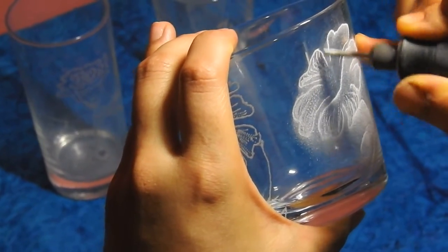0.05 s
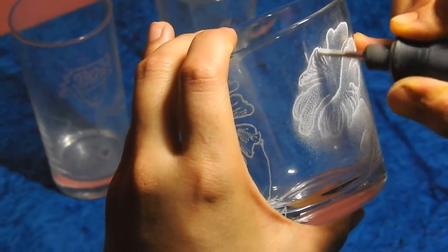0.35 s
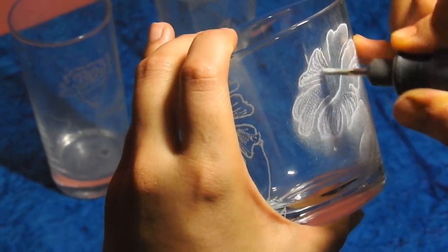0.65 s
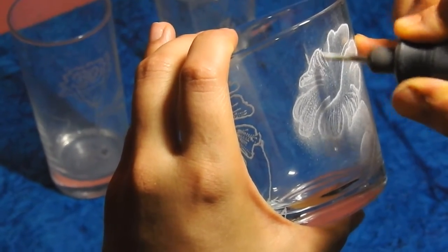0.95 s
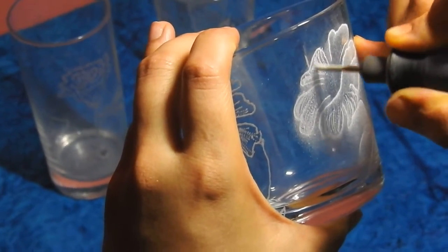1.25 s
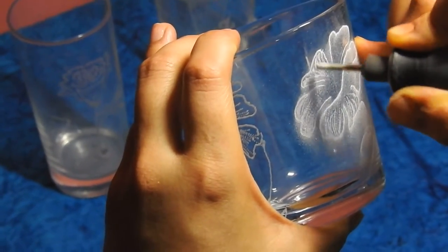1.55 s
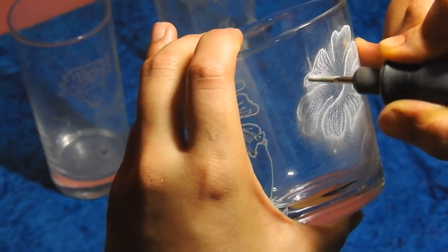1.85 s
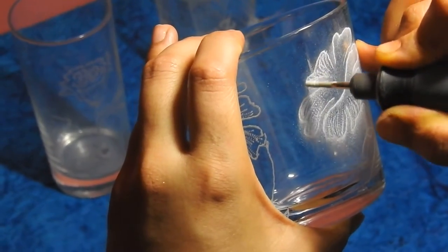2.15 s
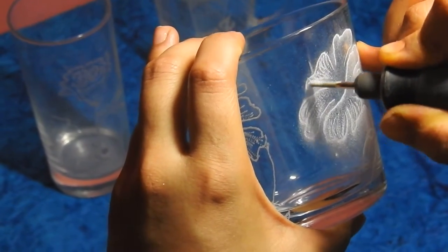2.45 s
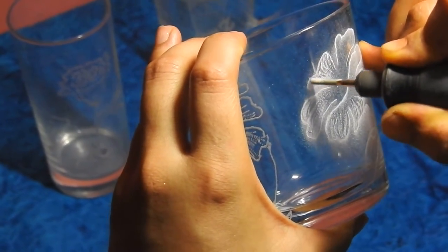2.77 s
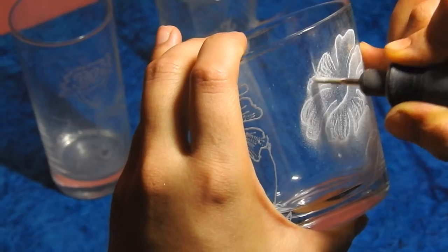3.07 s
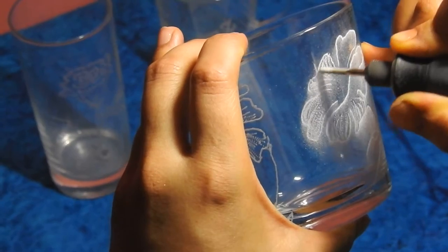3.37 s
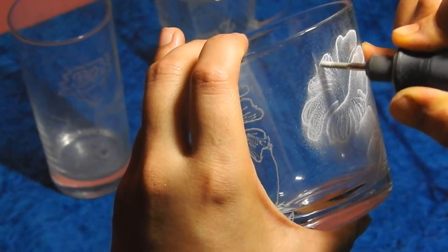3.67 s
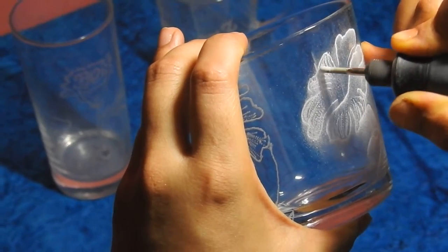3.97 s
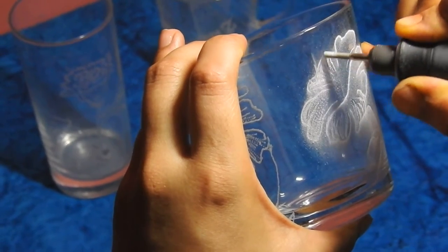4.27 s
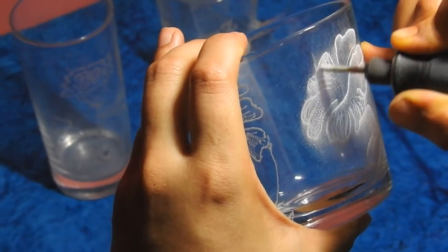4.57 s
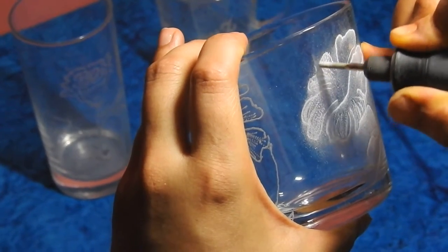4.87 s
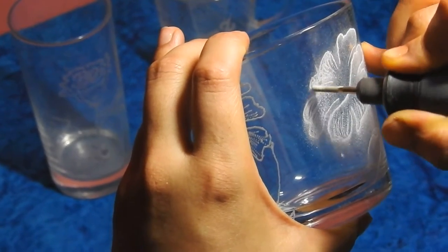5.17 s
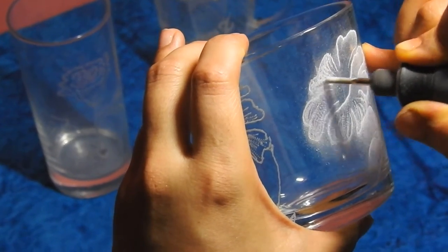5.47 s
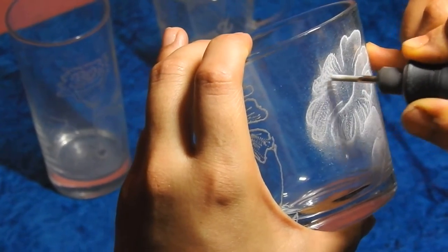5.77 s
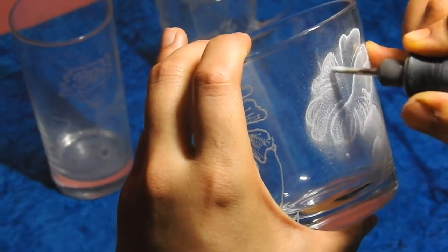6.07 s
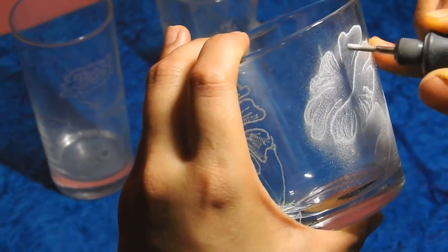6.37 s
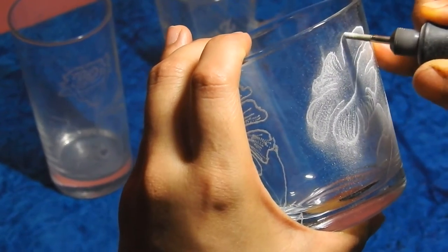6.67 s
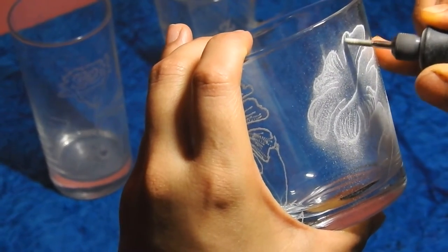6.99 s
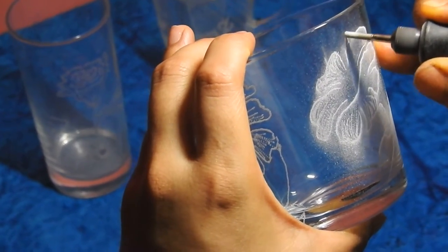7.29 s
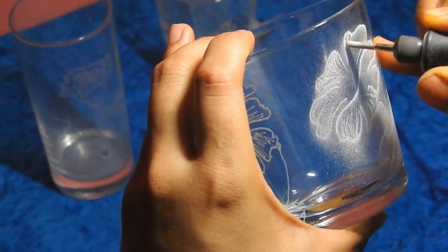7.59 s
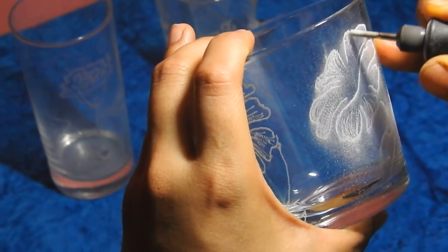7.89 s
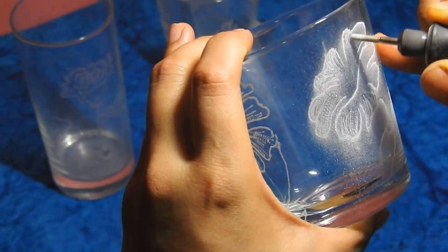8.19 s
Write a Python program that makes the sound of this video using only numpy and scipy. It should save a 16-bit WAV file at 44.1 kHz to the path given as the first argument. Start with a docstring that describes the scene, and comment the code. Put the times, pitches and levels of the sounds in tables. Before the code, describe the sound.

Close up, an engraving bit ticks and grinds against ringing glass, stroke after stroke, over the constant whine of a small motor.

```python
"""A small rotary tool engraves a drinking glass, close to a stereo microphone.
Each stroke of the bit lands with a crack, then scrapes the wall and sets it ringing. Underneath, at a
steady speed, the motor whines on its shaft orders, buzzes with the mains and crackles at its brushes.
The recorder's gain control pushes the motor back whenever the bit bites."""
import sys
import numpy as np
from scipy import signal
from scipy.fft import rfft, irfft, next_fast_len
from scipy.io import wavfile
from scipy.ndimage import uniform_filter1d, minimum_filter1d

SR = 44100
rng = np.random.default_rng(int(sys.argv[2]) if len(sys.argv) > 2 else 0)


def inscribe(sig):
    """Save sig as 16-bit PCM at rate SR to the path in sys.argv[1].

    A 1-D sig is mono; a 2-D sig holds one channel per row.
    Samples are clipped to [-1, 1] before scaling.
    """
    pcm = np.round(np.clip(np.atleast_2d(sig).T, -1, 1) * 32767)
    wavfile.write(sys.argv[1], SR, pcm.astype(np.int16))


N = 372201
TIME = np.arange(N) / SR

# Modes of the glass, damped by the hand. Each row: pitch in Hz, width in Hz, relative level in dB,
# family (rounded to an index).
GLASS_MODES = [(1673, 21, -8, 0), (2137, 65, -3.5, 2), (2216, 48, -3, 0.5), (3877, 19, -8.5, 0.5),
               (4662, 58, 4.5, 1.5), (7210, 920, -1, 3), (7797, 170, 5.5, 2), (11130, 110, -17, 2),
               (11910, 85, -13, 2)]
# Strokes of the bit: quick hatching, longer shading, hatching again, then close strokes at the rim.
# Each row: start in seconds, length in seconds, relative pressure in dB, relative landing knock in dB.
BIT_STROKES = [(0.104, .12, 4, -14), (0.339, 0.1, 4, -14.5), (0.578, 0.074, 4.5, -10),
               (0.793, .11, 1.5, -12), (1.027, 0.056, 6, -16), (1.23, 0.058, 4, -21),
               (1.413, 0.09, 1.5, -21), (1.62, 0.044, 5, -12.5), (1.96, 0.19, 0.5, -12.5),
               (2.172, 0.17, -1, -21), (2.363, .19, -0.5, -30), (2.622, 0.11, -1.5, -28),
               (2.862, .15, -0.5, -20), (3.026, 0.24, 2.5, -28), (3.308, 0.2, 2.5, -24),
               (3.591, 0.16, -0.5, -27), (3.756, 0.18, 5, -24), (3.962, 0.32, 2, -34),
               (4.296, 0.287, 2.5, -22), (4.684, 0.2, 3.5, -15), (4.872, 0.11, 0, -15),
               (5.018, 0.24, 1.5, -35), (5.378, 0.13, 2.5, -18), (5.628, 0.078, 3.5, -18),
               (5.838, 0.1, 4.5, -13), (6.05, 0.076, 0, -12.5), (6.675, .3, 0.5, -23), (6.992, .15, 3, -31),
               (7.19, 0.21, 4, -29), (7.411, 0.326, 6, -24), (7.757, 0.3, 5, -30), (8.054, .4, 5.5, -28)]


def from_db(db):
    """Decibels to gain."""
    return 10 ** (np.asarray(db) / 20)


def unit(x):
    """Scales x to an rms of one."""
    return x / np.sqrt(np.mean(x ** 2) + 1e-20)


def colour(x, points):
    """Filters x with a spectrum given as (Hz, dB) points."""
    hz, db = np.transpose(points)
    f = np.fft.rfftfreq(x.shape[-1], 1 / SR)
    return irfft(rfft(x) * from_db(np.interp(np.log(f + 1), np.log(hz), db)), x.shape[-1])


def noise(points, envelope=np.ones(N)):
    """Coloured noise of unit rms under an envelope; left and right differ most in the treble."""
    # Stereo width at the microphone. Each row: frequency in Hz, side minus mid in dB.
    stereo_width = [(60, -16), (200, -31), (700, -19.5), (1300, -14.5), (2400, -14), (4400, -12.5),
                    (8000, -3.5), (15000, -4.5)]
    size = len(envelope)
    white = rng.standard_normal((2, size)) * envelope
    mid, side = np.pad(white, ((0, 0), (0, next_fast_len(size, True) - size)))
    side = colour(side, stereo_width)
    return unit(colour(np.array([mid + side, mid - side]), points)[:, :size])


def drift(rate):
    """A random wander of unit rms through rate points a second."""
    knots = rng.standard_normal(4096)
    return unit(np.interp(TIME * rate, np.arange(len(knots)), knots))


def pan(db):
    """Gains of the two channels for a left minus right level."""
    return from_db([[db / 2], [-db / 2]])


def ring(x, hz, width):
    """One resonance, its width in Hz."""
    return signal.lfilter(*signal.iirpeak(hz, hz / width, SR), x)


def add(mix, s, sound):
    """Mixes a sound in at s seconds."""
    part = mix[:, round(s * SR):][:, :sound.shape[-1]]
    part += sound[:, :part.shape[-1]]


def strikes(turns, spread_db, jitter_s):
    """One click of random size in each cycle of turns."""
    at = np.flatnonzero(np.diff(np.floor(turns)))
    size, late = rng.standard_normal((len(at), 2)).T
    at = np.clip(at + np.round(late * jitter_s * SR).astype(int), 0, N - 1)
    clicks = np.zeros(N)
    clicks[at] = from_db(spread_db * np.minimum(size, 2))
    return clicks


def bursts(clicks, decay_s, share):
    """Envelope of a noise that has a share of its power in short bursts after the clicks."""
    power = signal.lfilter([1], [1, -np.exp(-1 / (decay_s * SR))], clicks ** 2)
    return np.sqrt(1 - share + share * power / power.mean())


def tone(turns, waver_db, blur):
    """A partial that wavers in strength and, by about blur radians, in phase."""
    return unit(from_db(waver_db * drift(9.7)) * np.cos(2 * np.pi * turns + blur * drift(45)))


def grip():
    """The hand shifts its grip with soft, dull rubs."""
    # Each row: start in seconds, length in seconds, centre in Hz, relative level in dB.
    rubs = [(3.48, 0.22, 273, -36.5), (3.63, 0.16, 237, -32), (4.139, 0.13, 119, -33), (5.74, .14, 60, -45)]
    out = np.zeros((2, N))
    for start, length, hz, db in rubs:
        swell = np.hanning(round(length * SR))
        band = [(hz / 4, -24), (hz / 1.2, 0), (hz * 1.4, 0), (hz * 4, -30), (hz * 20, -80)]
        add(out, start, from_db(db) * noise(band, swell) * np.sqrt(swell))
    return out


def hum():
    """A low hum sits in the centre, behind the tool."""
    # Each row: pitch in Hz, level in dB.
    partials = [(100, -51.5), (180, -45.5), (200, -41), (300, -46)]
    return sum(from_db(db) * tone(hz * TIME, waver_db=2.8, blur=0.65) for hz, db in partials)


def fan():
    """Cooling air rushes through the tool and resonates in its housing."""
    # Each row: frequency in Hz, relative density in dB.
    air_spectrum = [(20, -48), (34, -43), (48, -13.5), (80, -15.5), (108, -8.5), (145, -14), (200, -7),
                    (320, -8.5), (850, -9), (1050, -9.5), (1500, -7), (2700, -6.5), (4000, -10.5),
                    (6000, -34)]
    # Each row: pitch in Hz, width in Hz, level in dB.
    housing_modes = [(1276, 33, -33.5), (1421.6, 15, -33.5), (2480, 200, -38)]
    air = from_db(-24) * noise(air_spectrum, from_db(1.02 * drift(40)))
    housing = sum(from_db(db) * unit(ring(noise(air_spectrum), hz, width))
                  for hz, width, db in housing_modes)
    return pan(-1.46) * air + pan(-1.6) * housing


def brushes(turns):
    """The brushes hiss and spark twice a turn."""
    # Each row: frequency in Hz, relative density in dB.
    spark_spectrum = [(1500, -20.5), (3000, -15), (4200, -2), (5200, 2), (6600, 5.5), (7500, -0.5),
                      (8400, -8), (10000, -18), (12000, -24.5), (15500, -101)]
    sparks = strikes(2 * turns, spread_db=8.0, jitter_s=0.00008)
    crackle = bursts(sparks, decay_s=0.00044, share=0.24)
    return from_db(-15.5) * pan(-0.52) * noise(spark_spectrum, crackle)


def armature_buzz(turns, order=16, mains_hz=50):
    """Rectified mains current ripples the armature's note into a cluster of sidebands."""
    # Each row: ripple steps away from the note, level in dB.
    sidebands = [(-2, -42), (-1, -91), (0, -39.5), (1, -29), (2, -27.5), (3, -40.5)]
    ripple = 2 * mains_hz * TIME
    return pan(0.54) * sum(from_db(db) * tone(order * turns + step * ripple, waver_db=2.5, blur=0.2)
                           for step, db in sidebands)


def motor_whine(turns):
    """The motor sings on its shaft orders; three shrill ones beam past the microphone as the hand turns."""
    # Each row: multiple of the shaft rate (rounded when played), level in dB, left minus right in dB.
    orders = [(3, -48.5, 1.5), (4, -44.5, 1), (6, -59, -13), (14, -47, 0), (17, -45.5, 31.5), (20, -42, 0),
              (21, -54, 0), (22, -41, -2), (24, -37.5, 7), (26, -46, 0), (27, -38, 0), (28, -46, 1),
              (30, -57, 0), (48, -35.5, -11), (64.66, -41, 9.5)]
    # Multiples of the shaft rate, the last just off a whole order like a bearing's.
    shrill_orders = [32, 36, 40.92]
    # Each row: time in seconds, then the level of each shrill partial in dB.
    beaming = [(0.0, -32, -25.5, -26), (0.55, -25, -21.5, -25), (1.2, -31, -21.5, -27.5),
               (4.2, -27, -21.5, -23.5), (4.8, -32, -26, -22), (5.1, -26, -19.5, -24),
               (6.5, -30, -21.5, -21.5), (7.3, -26, -27, -22.5), (8.44, -30, -21.5, -24.5)]
    whine = sum(from_db(db) * pan(balance) * tone(round(order) * turns, waver_db=3.0, blur=0.43)
                for order, db, balance in orders)
    times, *beams = np.transpose(beaming)
    shrill = sum(from_db(np.interp(TIME, times, db)) * tone(order * turns, waver_db=1.2, blur=0.31)
                 for order, db in zip(shrill_orders, beams))
    return whine + pan(-8.0) * shrill


def taps():
    """Each landing of the bit is a short crack that sets the glass ringing."""
    # Each row: frequency in Hz, relative density in dB.
    crack_spectrum = [(300, -31), (900, -14), (1400, 12.5), (2400, 4.5), (4000, 11.5), (8000, -26),
                      (11000, -36), (15000, -55)]
    cracks, t = np.zeros((2, N)), np.arange(2048) / SR
    envelope = (1 - np.exp(-t / 0.00026)) * np.exp(-t / 0.011)
    for start, _, _, db in BIT_STROKES:
        add(cracks, start, from_db(db) * noise(crack_spectrum, envelope))
    ringing = sum(from_db(db) * ring(cracks, hz, width) for hz, width, db, _ in GLASS_MODES)
    return from_db(-9.0) * cracks + from_db(-4.0) * ringing


def pressure(bite_s=0.023, lift_s=0.039, waver_db=2.5, graze_db=-23):
    """Each stroke bites, holds unsteadily and lifts; in between, the bit grazes faintly."""
    held = np.zeros(N)
    for start, length, db, _ in BIT_STROKES:
        bite = np.clip((TIME - start) / bite_s, 0, 1)
        lift = np.clip((start + length + lift_s - TIME) / lift_s, 0, 1) ** 2
        held += from_db(db) * bite * lift
    return from_db(graze_db) + held * from_db(waver_db * np.tanh(drift(22)))


def skid(decay_s=0.029, boost_db=8.5):
    """Envelope of the bit's brief skid after each landing, in proportion to its knock."""
    return sum(from_db(db + boost_db) * (TIME >= start) * np.exp(-abs(TIME - start) / decay_s)
               for start, _, _, db in BIT_STROKES)


def glass(drive, press, move_s=0.05):
    """The wall rings in its modes, weighted by how hard and where the bit touches it."""
    # Places of contact. Each row: start in seconds, then the weight in dB of mode families 0 to 3:
    # lower wall, upper wall (holds no mode), rim, broad screech.
    places = [(0, -13.5, -14, -10, -11), (0.55, -12, -19, -14, -8), (1.15, -15, -18, -19, -9),
              (1.95, -17, -10, -22, -1), (2.85, -13.5, -12.5, -20, -6), (5.35, -11.5, -19, -21, -6),
              (6.67, -15, -6.5, -11, -22)]
    starts, *families = np.transpose(places)
    place = np.searchsorted(starts[1:], TIME)
    glide = round(move_s * SR) + 1
    weights = [press * uniform_filter1d(from_db(db)[place], size=glide) for db in families]
    weights[0] += skid()  # skidding rings the lower wall
    return sum(from_db(db) * weights[round(family)] * unit(ring(ring(drive, hz, width), hz, 6 * width))
               for hz, width, db, family in GLASS_MODES)


def engraving(turns):
    """The slightly eccentric bit strikes once a turn, chips twice a turn and drags its grit in between."""
    # Each row: frequency in Hz, relative density in dB.
    scrape_spectrum = [(500, -38), (1500, -9), (3000, -6), (4200, -0.5), (5300, 7), (6300, 5), (7700, -2.5),
                       (8500, -4), (10000, -16.5), (12000, -17), (13200, -74), (14600, -49), (15500, -54)]
    press = pressure()
    blows = unit(strikes(turns, spread_db=4.5, jitter_s=0.00007))
    chips = unit(strikes(2 * turns, spread_db=3.0, jitter_s=0.00009))
    grit = noise(scrape_spectrum, bursts(blows + chips, decay_s=0.00061, share=0.87))
    ringing = glass(grit + from_db(-15.5) * blows, press)
    return from_db(-16.0) * pan(-0.4) * press * grit + from_db(-14.0) * pan(0.3) * ringing


def scene():
    """Close up, one spinning shaft drives both the motor's sound and the bit."""
    # Each row: time in seconds, shaft turns per second.
    shaft_speed = [(0, 139.66), (0.6, 139.98), (1.2, 139.45), (1.8, 139.54), (2.3, 139.45), (2.6, 139.37),
                   (3, 139.39), (3.6, 139.13), (4.2, 139.26), (4.55, 139.0), (5, 139.15), (6.1, 139.28),
                   (7.15, 140.21), (8.44, 139.75)]
    shaft_hz = np.interp(TIME, *np.transpose(shaft_speed)) + 0.09 * drift(14)
    turns = np.cumsum(shaft_hz) / SR
    motor = motor_whine(turns) + armature_buzz(turns) + hum() + fan() + brushes(turns)
    return motor + engraving(turns) + taps() + grip()


def record(dry, limit_db=-12.0, recovery_db_per_s=130, makeup_db=-0.02, edge_hz=15650):
    """Behind the microphone: fast gain control, a limiter for the tallest peaks, then a low-pass."""
    power_db = 10 * np.log10(abs(uniform_filter1d((dry ** 2).mean(0), size=600)) + 1e-12)
    recovery = TIME * recovery_db_per_s
    tracked_db = np.maximum.accumulate(power_db + recovery) - recovery
    over_db = np.maximum(tracked_db - limit_db, 0)
    held = dry * from_db(makeup_db - uniform_filter1d(over_db, size=200))
    headroom = minimum_filter1d(1 / np.maximum(abs(held).max(0), 1), size=121)
    limited = held * uniform_filter1d(uniform_filter1d(headroom, size=61), size=61)
    lowpass = signal.firwin(511, edge_hz, window=("kaiser", 9), fs=SR)
    return signal.oaconvolve(limited, lowpass[None], "same")


dry = scene()
out = record(dry)
inscribe(out)
```